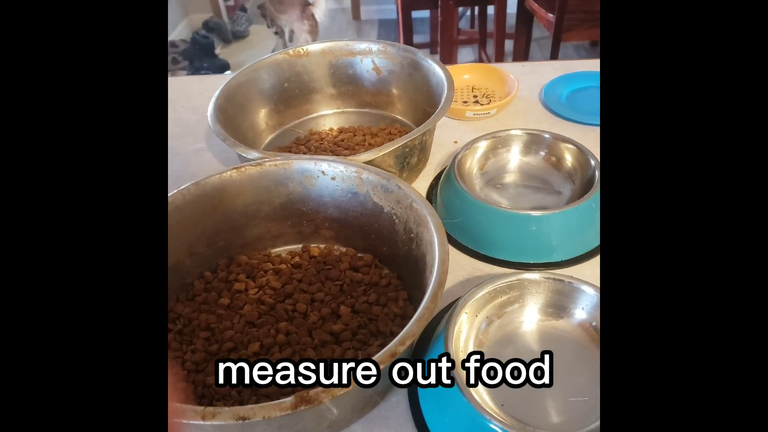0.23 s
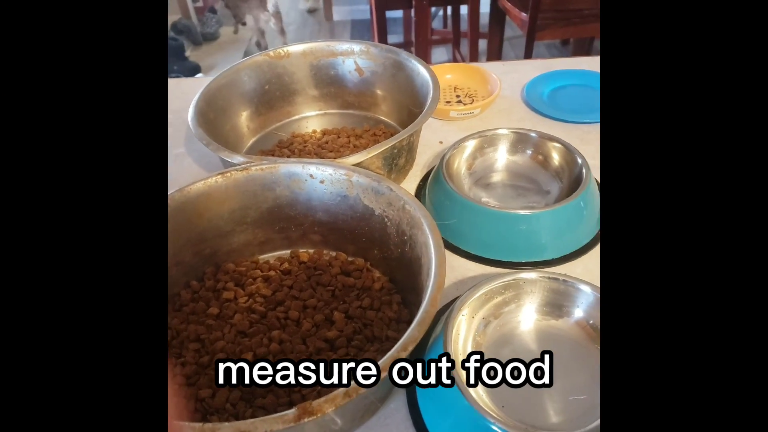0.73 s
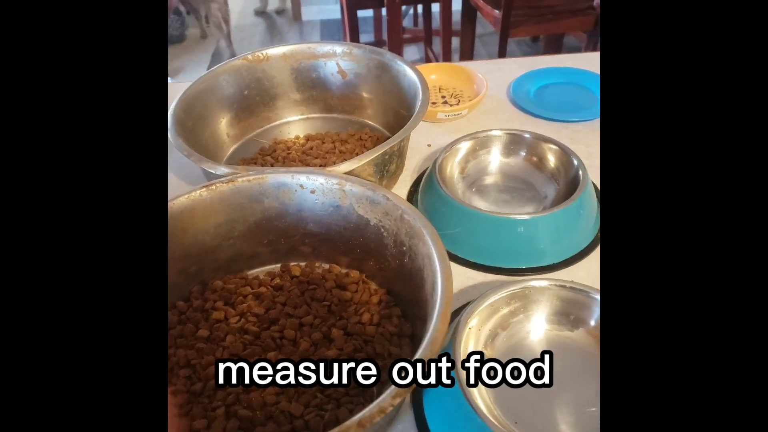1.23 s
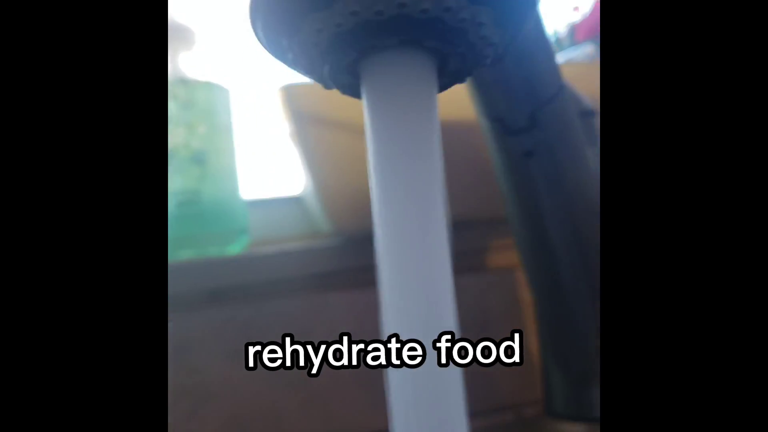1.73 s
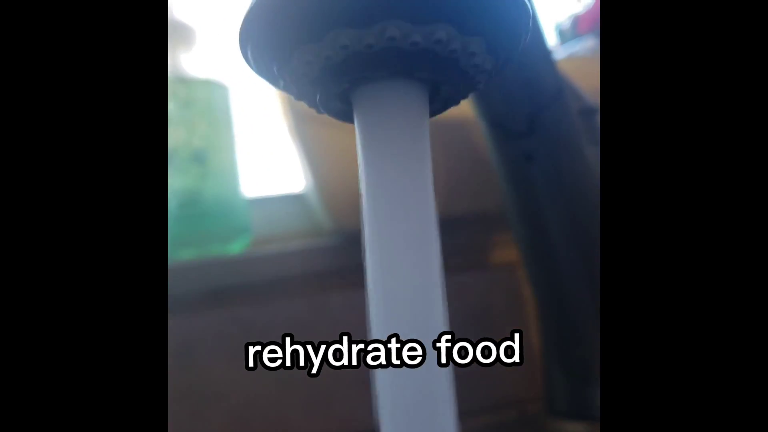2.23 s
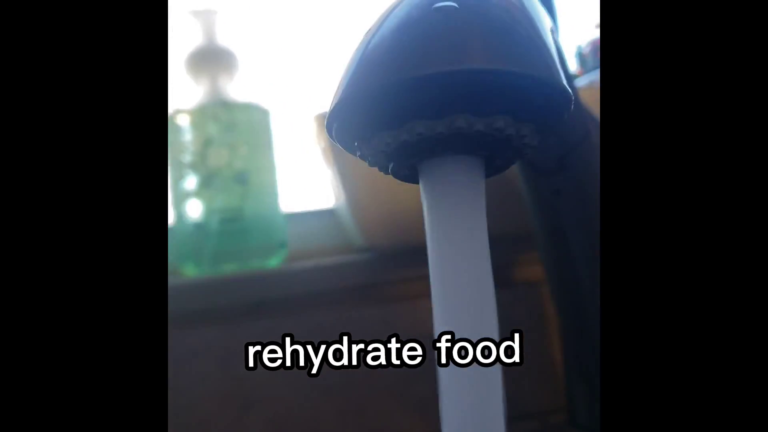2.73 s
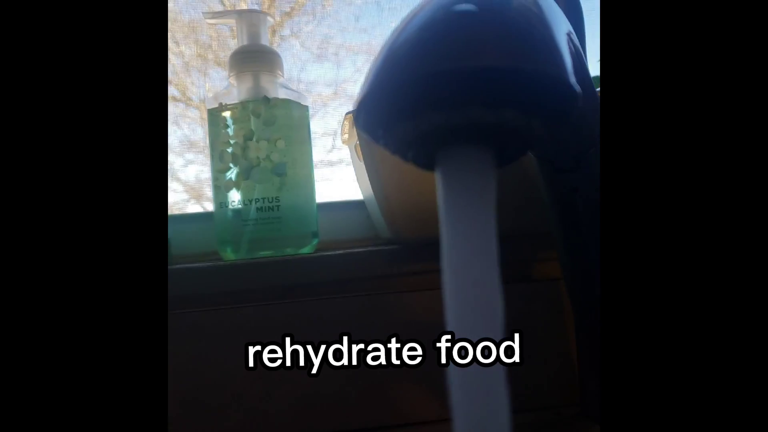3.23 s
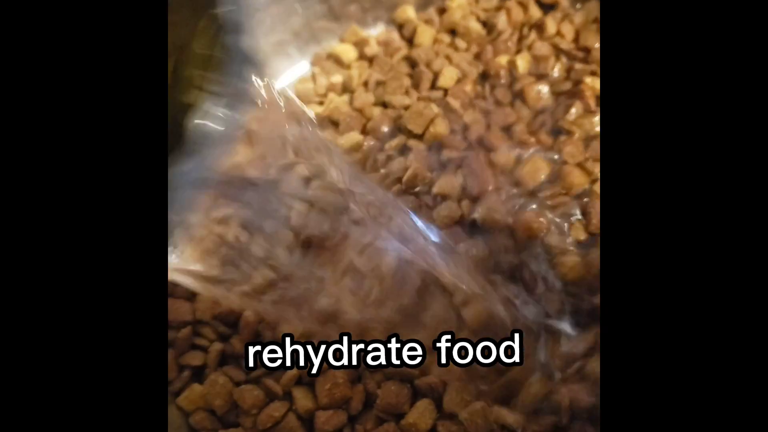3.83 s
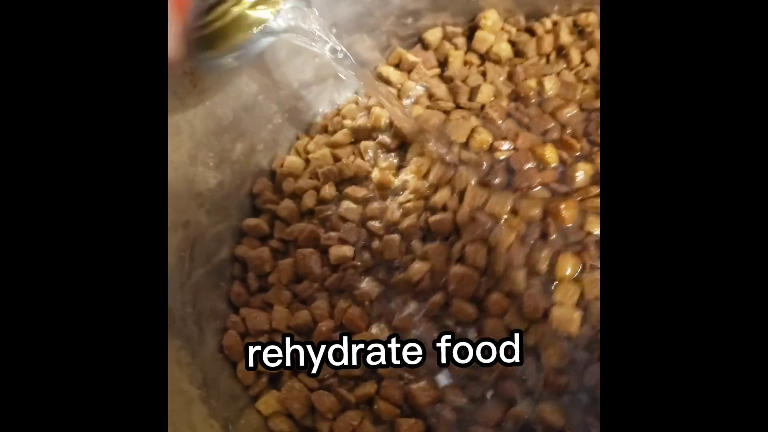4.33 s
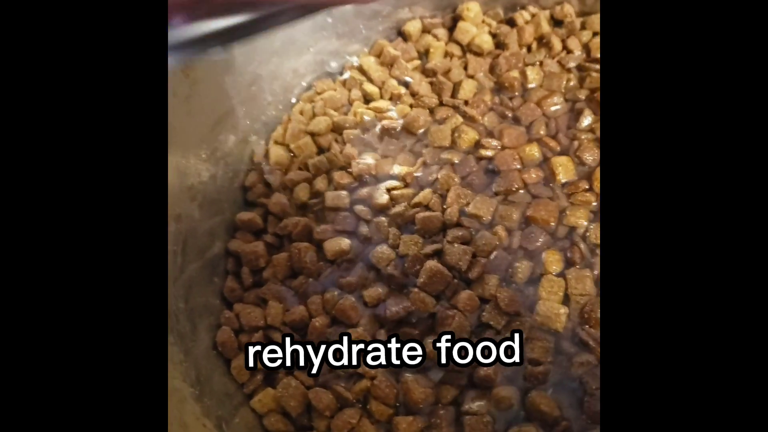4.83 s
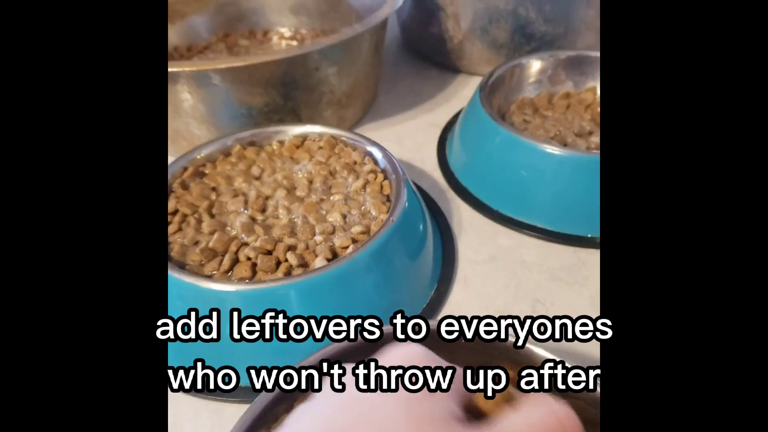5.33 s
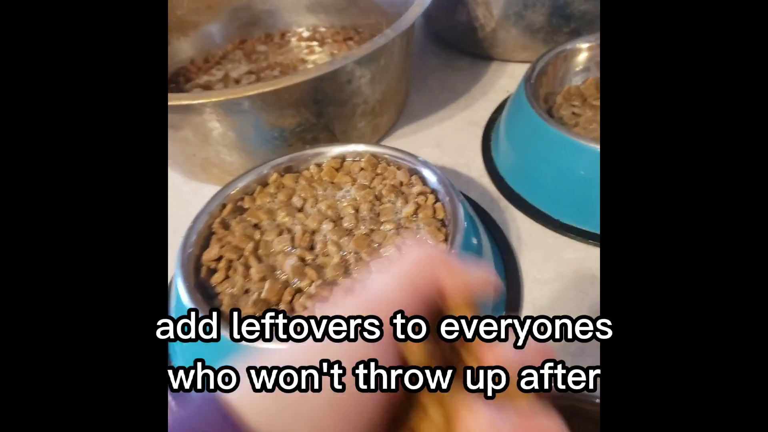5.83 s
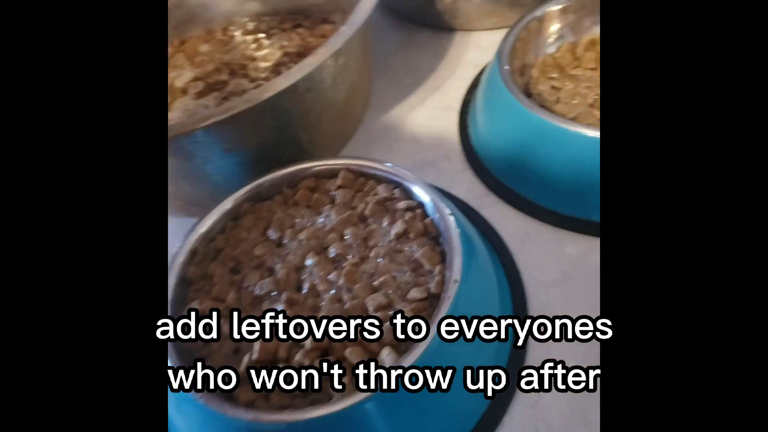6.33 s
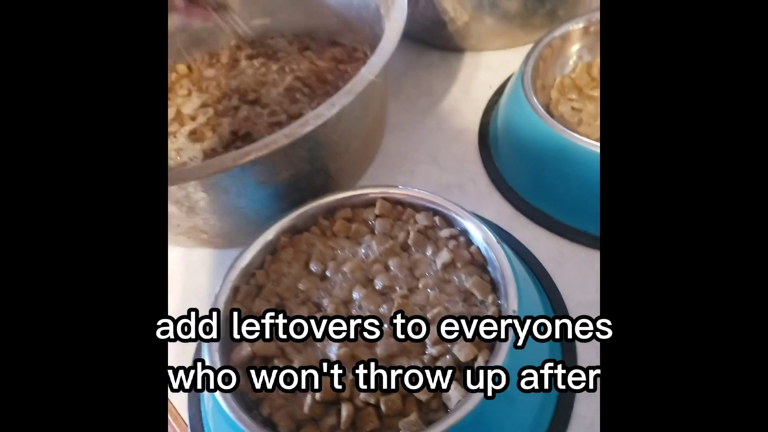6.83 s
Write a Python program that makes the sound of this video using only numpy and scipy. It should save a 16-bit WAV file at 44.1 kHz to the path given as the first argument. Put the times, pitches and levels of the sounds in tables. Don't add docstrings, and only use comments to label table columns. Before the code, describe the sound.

In a small hard kitchen, a phone close to the action catches faint dry ticks and cloth rustle over a low beating fridge hum. A tap lever thumps, spits air and rushes in loud broad hiss. After a cut, water splashes and gurgles over dry kibble, thinning to drips. Finally a ring pings a steel bowl, kibble clicks, and a handful patters down.

```python
import sys
import numpy as np
from scipy import signal
from scipy.fft import rfft, irfft, next_fast_len
from scipy.io import wavfile
from scipy.ndimage import uniform_filter1d

SR = 44100
rng = np.random.default_rng(int(sys.argv[2]) if len(sys.argv) > 2 else 0)


def gain_from_db(level_db):
    decades = np.asarray(level_db, float) / 20
    return 10 ** decades


def inscribe(sig):
    pcm = np.round(np.clip(np.atleast_2d(sig).T, -1, 1) * 32767)
    wavfile.write(sys.argv[1], SR, pcm.astype(np.int16))


N = 313110

# (start [s], end [s])
SHOTS = [
    (0, 1.239),
    (1.365, 3.46),
    (3.577, 5.169),
    (5.272, 7.11),
]
COUNTER_SHOT, TAP_SHOT, POUR_SHOT, HAND_SHOT = SHOTS
# (frequency [Hz], left minus right [dB])
HAND_LEAN = [(60, 2.5), (110, 3.6), (200, 1.9), (380, 2.3), (700, 3.5), (1290, 4.9), (2380, 4.2), (4400, 4),
             (8120, 19.6), (15000, 8.5)]
# (time [s], flow level [dB])
CAN_FLOW = [(3.58, -44.5), (3.75, -46), (3.83, -40.5), (3.92, -45), (4.2, -43.5), (4.3, -47.5), (4.53, -59),
            (4.6, -72)]


def curve(table):
    s, *columns = np.transpose(table)
    start = int(s[0] * SR)
    t = np.arange(start, min(int(s[-1] * SR), N)) / SR
    return start, [np.interp(t, s, c) for c in columns]


def on_log(hz, points):
    point_hz, value = np.transpose(points)
    return np.interp(np.log(hz), np.log(point_hz), value)


def walk(size, rate):
    k = int(SR / rate)
    steps = np.repeat(rng.standard_normal(size // k + 1), k)
    return 1.33 * uniform_filter1d(uniform_filter1d(steps, k), k)[:size]


def add(out, s, sound, pan_db=0.):
    i = int(s * SR)
    sound = np.atleast_2d(sound) * gain_from_db(np.array([[pan_db], [-pan_db]]) / 2)
    out[:, i:i + sound.shape[1]] += sound[:, :N - i]


def ring(hz, t60, glide=0., rise=0.00011):
    t = np.arange(int(min(t60, .6) * SR) + 8) / SR
    tone = np.sin(2 * np.pi * hz * t * (1 + glide * t / t60))
    return tone * (1 - np.exp(-t / rise)) * 1000 ** (-t / t60)


def whistle(out, table, wobble, rough_db):
    start, (hz, db) = curve(table)
    hz = hz * (1 + wobble * walk(len(hz), 90))
    tone = np.sin(2 * np.pi * np.cumsum(hz) / SR)
    add(out, start / SR, gain_from_db(db + rough_db * walk(len(hz), 60)) * tone, 3.)


def loudness(shot, rest, moves, moves_mix, flow=None, flow_mix=None):
    rise_db, fall_db_s = 21, 201
    t = np.arange(int(shot[0] * SR), min(int(shot[1] * SR), N)) / SR
    power = gain_from_db(np.array(rest)[:, None] + 0 * t) ** 2
    if flow is not None:
        power = power + gain_from_db(np.array(flow_mix)[:, None] + np.interp(t, *np.transpose(flow))) ** 2
    for s, db, rise, hold, tilt in moves:
        swell = -rise_db * np.maximum(s - t, 0) / max(rise, .003)
        shape = swell - fall_db_s * np.maximum(t - s - hold, 0)
        mix = np.array(moves_mix) + tilt * (np.arange(4) - 1)
        power = power + gain_from_db(db + (mix[:, None] + shape)) ** 2
    return 10 * np.log10(power)


def bed(out, shot, levels, tone, lean, flicker_db, grain_db, direct=0.):
    # (frequency [Hz], correlation [-1 to 1])
    likeness = [(60, 0.92), (130, 0.99), (290, 0.85), (640, 0.33), (1410, -0.5), (3100, -0.19), (6820, 0.1),
                (15000, -0.03)]
    control_hz = (200, 1500, 5700, 12500)
    port_lag_s = .0003
    length = len(levels[0])
    size = next_fast_len(length)
    hz = np.maximum(np.arange(size // 2 + 1) * SR / size, 1.)
    droplet_db = rng.standard_normal((2, size // 64 + 1)).repeat(64, axis=1)[:, :size]
    a, b = rfft(rng.standard_normal((2, size)) * gain_from_db(grain_db * droplet_db))
    alike = np.clip(on_log(hz, likeness), direct, .995)
    mid, side = a * np.sqrt(1 + alike), b * np.sqrt(1 - alike)
    tilt = gain_from_db(on_log(hz, lean) / 2)
    late = np.exp(-2j * np.pi * hz * port_lag_s * (direct > 0) * np.clip(hz / 1500, 0, 1))
    both = np.array([(mid + side) * tilt, (mid - side) / tilt * late])
    both = both * gain_from_db(on_log(hz, tone)) * (hz < 15650)
    edges = [(90, 450), (700, 3000), (4000, 8000), (10000, 15500)]
    centre_signal = both.mean(0)
    heard = [20 * np.log10(np.std(irfft(centre_signal * (hz > lo) * (hz < hi), size))) for lo, hi in edges]
    sound = 0
    for centre in 25 * 2 ** (np.arange(29) / 3):
        mask = np.clip(1 - abs(3 * np.log2(hz / centre)), 0, 1)
        share = [np.interp(np.log(centre), np.log(control_hz), row) for row in np.eye(4)]
        db = sum(w * (c - h) for w, c, h in zip(share, levels, heard))
        db = db + flicker_db * walk(length, 14.06)
        sound = sound + irfft(both * mask, size)[:, :length] * gain_from_db(db)
    add(out, shot[0], sound)


def fridge(out):
    # (frequency [Hz], level [dB], second frequency [Hz], second level [dB], null time [s])
    motors = [(65, -48.5, 59.5, -61.5, .24), (67.2, -53.5, 65, -62.5, 2.1), (66.9, -52, 59.3, -49, 3.9),
              (65.7, -53, 59.2, -58, 5.5)]
    # (frequency [Hz], level [dB])
    overtones = [(188.4, -76.5), (285.3, -78.5), (376.8, -75), (570.6, -91)]
    for (a, b), (hz, db, other_hz, other_db, null) in zip(SHOTS, motors):
        t = np.arange(int((b - a) * SR)) / SR + a - null
        first = np.sin(2 * np.pi * hz * t + .5 * walk(len(t), 2.6))
        second = np.sin(2 * np.pi * other_hz * t)
        add(out, a, gain_from_db(db + 2.3 * walk(len(t), 5)) * first, .5)
        add(out, a, -gain_from_db(other_db + 2.9 * walk(len(t), 3.2)) * second, .5)
    t = np.arange(int(COUNTER_SHOT[1] * SR)) / SR
    for hz, db in overtones:
        level = np.sqrt(2) * gain_from_db(db + 0.53 * walk(len(t), 5.8))
        add(out, 0, level * np.sin(2 * np.pi * hz * t), .5)


def ticks(out, table, crack_s, gain_db, tail_db, t60, note_db=-15.):
    # (frequency [Hz], level per Hz [dB])
    kibble_tone = [(240, -33.5), (400, 0), (570, -5), (1140, 0), (1250, -3.5), (2460, 0.5), (2820, -4),
                   (6890, -4.5), (8670, -9.5), (14600, 9), (15800, -23)]
    # (time [s], left minus right [dB])
    place = [(1., 6), (4., 8), (5.4, 11.5), (5.95, 3.5), (6.45, 16), (6.75, 15.5), (7.05, 10.5)]
    t = np.arange(8192) / SR
    hz = np.maximum(np.arange(4097) * SR / 8192, 1.)
    for s, db, body, edge, *note_hz in table:
        pan = np.interp(s, *np.transpose(place))
        tilt = [(1400, body + 9.9), (4500, 0), (7500, 0.0027), (12000, edge + 3.9)]
        colour = gain_from_db(on_log(hz, kibble_tone) + on_log(hz, tilt))
        noise = irfft(rfft(rng.standard_normal((3, len(t)))) * colour)
        noise /= noise.std()
        crack = noise[0] * (1 - np.exp(-t / 0.0002)) * np.exp(-t / crack_s)
        tail = noise[1:] * (1 - np.exp(-t / 0.0016)) * 1000 ** (-t / t60)
        add(out, s - .0003, gain_from_db(db + gain_db) * crack / abs(crack).max(), pan)
        add(out, s, gain_from_db(db + tail_db) * tail, 0.48 * pan)
        note = ring(*(note_hz or [1900 * 3.3 ** rng.random()]), 0.009)
        add(out, s, gain_from_db(db + gain_db + note_db - .6 * (edge + 12) * (edge > -12)) * note, pan)


def counter(out):
    # (time [s], peak [dB], body [dB], edge [dB])
    dry_ticks = [(0.1311, -65, -27, -6), (0.302, -59.5, -7, -3), (0.4783, -58, -30, -4),
                 (0.4883, -42.5, -37, -4), (0.618, -54, -54, -6), (0.971, -63, -6, -25),
                 (0.977, -63, -8, -25), (0.982, -66, -6, -25), (1.039, -60, -37, -6),
                 (1.059, -60, -23, -20), (1.047, -53, -37, -6)]
    # (rumble [dB], body [dB], hiss [dB], spray [dB])
    rest = (-64, -85, -92, -85.5)
    # (time [s], peak [dB], rise [s], hold [s], tilt from range to range [dB]), and their mix [dB]
    cloth = [(.16, -81, .05, 0.18, 1.5), (0.506, -61, .04, .01, -1.5), (0.722, -72, 0.1, .02, -0.5),
             (1.045, -76.5, .015, .02, 5.5)]
    cloth_mix = (-3, -7.5, -8, -1.5)
    # (frequency [Hz], level per Hz [dB])
    tone = [(47, -13), (80, -9), (114, -12), (194, -19), (322, -29.5), (385, -24), (480, -41), (1580, -48),
            (6820, -43.5), (8320, -58), (14500, -55), (15800, -53)]
    ticks(out, dry_ticks, crack_s=0.0026, gain_db=-1.5, tail_db=-10.5, t60=0.3, note_db=-26.)
    levels = loudness(COUNTER_SHOT, rest, cloth, cloth_mix)
    bed(out, COUNTER_SHOT, levels, tone, HAND_LEAN, flicker_db=-2.5, grain_db=1.0)


def chimes(out):
    # (time [s], frequency [Hz], level [dB], ring time [s])
    small_rings = [(.145, 11700, -61, 0.17), (1.06, 11750, -61.5, 0.11), (6.621, 1550, -46, 0.035),
                   (6.63, 1530, -58, .15), (.508, 1100, -72, .07), (.99, 960, -74, .06),
                   (5.83, 2100, -37.5, 0.032), (5.83, 5000, -37, .02)]
    for s, hz, db, t60 in small_rings:
        note = ring(hz, t60)
        add(out, s, gain_from_db(db + 4.6 * walk(len(note), 150)) * note)


def tap(out):
    # (time [s], frequency [Hz], level [dB])
    valve = [(1.369, 4520, -71), (1.432, 4540, -66.5), (1.5, 4600, -54), (1.551, 4600, -82.5)]
    # (time [s], peak [dB], body [dB], edge [dB])
    spits = [(1.4935, -22, -14, -10), (1.5035, -17, -30, -2), (1.5315, -16, -30, -2)]
    # (rumble [dB], body [dB], hiss [dB], spray [dB])
    rest = (-56.5, -86, -81, -89.5)
    flow_mix = (-28, -20, -10.5, 0.5)
    # (time [s], flow level [dB])
    flow = [(1.43, -84.5), (1.477, -60), (1.481, -33.5), (1.496, -23.5), (1.52, -23), (1.77, -26),
            (2.55, -26.5), (2.7, -28.5), (3.1, -29.5), (3.46, -30)]
    # (time [s], peak [dB], rise [s], hold [s], tilt from range to range [dB]), and their mix [dB]
    lever = [(1.44, -32, 0.012, 0.059, -1), (1.725, -35.5, 0.033, .005, 9.5), (2.3, -53.5, .2, .25, 3)]
    lever_mix = (0.5, -14.5, -41, -55)
    # (frequency [Hz], left minus right [dB])
    tone = [(15, -62), (25, -55), (37, -32), (49, -16.5), (74, -5), (141, -13.5), (248, -13.5), (527, -27),
            (1040, -25), (2660, -14.5), (3390, -17.5), (6660, -10.5), (8270, -18.5), (14600, -3),
            (15800, -10)]
    lean = [(60, -0.5), (300, 1.5), (700, 0), (1300, 6), (2400, -3.5), (4400, 2.2), (8000, 3), (11000, 1.5),
            (15000, 6)]
    whistle(out, valve, wobble=0.0057, rough_db=-5.0)
    ticks(out, spits, crack_s=0.0009, gain_db=0.0, tail_db=-30., t60=.05)
    levels = loudness(TAP_SHOT, rest, lever, lever_mix, flow, flow_mix)
    bed(out, TAP_SHOT, levels, tone, lean, flicker_db=1.12, grain_db=1.17, direct=.3)


def splashes(out, table, cycles, gain_db, pan_db, spread, near=0.):
    for s, db, hz in table:
        add(out, s, gain_from_db(db + gain_db) * ring(hz, cycles / hz, glide=0.18), pan_db)
        for lag, up, size in rng.random((7, 3)):
            small = ring(max(800, near * hz) * spread ** up, .004, glide=.25)
            add(out, s + .0015 * lag, gain_from_db(db + gain_db - 3.5 - 6 * size) * small, pan_db)


def tap_sputter(wet):
    # (time [s], peak [dB], pitch [Hz])
    sputter = [(1.433, -23, 914), (1.493, -27.5, 895), (1.692, -27, 2010), (1.699, -23, 1870),
               (1.706, -26, 2280), (1.712, -24, 1500), (1.716, -13.5, 1780), (1.7195, -14.5, 2280),
               (1.723, -18, 2630), (1.73, -25, 2000), (1.83, -30, 1500)]
    splashes(wet, sputter, cycles=28.0, gain_db=-5.0, pan_db=4.5, spread=2.2, near=.75)


def thumps(out):
    # (time [s], peak [dB], pitch [Hz], length [cycles])
    blows = [(1.4334, -12, 160, 2.4), (1.7196, -23.5, 104.8, 1.6)]
    for s, db, hz, cycles in blows:
        turn = np.arange(int(cycles / hz * SR)) * hz / SR
        add(out, s, -gain_from_db(db) * np.sin(2 * np.pi * turn) * np.sin(np.pi * turn / cycles), 1.5)


def knocks(out):
    # (time [s], peak [dB], pitch [Hz])
    pushes = [(1.434, -24, 290), (1.446, -30.5, 170), (1.464, -22, 113), (1.48, -27.5, 176),
              (1.509, -29.5, 109), (1.554, -28, 154.4), (1.718, -37, 317), (1.734, -33.5, 109),
              (1.806, -39.5, 348), (1.808, -34, 100), (2.54, -40, 111.3), (3.738, -46, 240),
              (3.849, -46, 235), (4.393, -40.5, 226.6), (4.604, -41.5, 229), (4.783, -41.5, 222),
              (5.529, -51, 227.5), (5.559, -46, 152), (6.898, -44, 137), (6.96, -48, 210), (7.0, -46, 150),
              (7.045, -47, 220)]
    for s, db, hz in pushes:
        t60 = np.clip(0.061 + 0.18 * hz / 1000, .02, .3)
        add(out, s, gain_from_db(db + 4.0) * ring(hz, t60, rise=0.001), 1.5)
        add(out, s, gain_from_db(db - 6.0) * ring(1.6 * hz, 1.2 * t60, rise=0.00075), 1.5)


def pour(out):
    # (time [s], peak [dB], body [dB], edge [dB])
    drops = [(3.727, -20, -18, -18), (3.707, -27, -16, -18), (3.816, -27, -16, -16), (4.04, -28, -20, -14),
             (4.131, -29, -18, -14), (4.422, -33, -20, -14), (4.155, -31, -16, -14), (4.248, -27, -14, -16),
             (4.324, -32, -26, -16)]
    # (rumble [dB], body [dB], hiss [dB], spray [dB])
    rest = (-57.5, -63.5, -51, -40.5)
    flow_mix = (-23, 0, -1, -9)
    # (time [s], peak [dB], rise [s], hold [s], tilt from range to range [dB]), and their mix [dB]
    slosh = [(3.6, -52.5, .02, 0.023, 0), (3.83, -45.5, .06, 0.018, 6.5), (4.45, -54, .1, 0.016, -1),
             (4.8, -54, 0.2, 0.047, 0)]
    slosh_mix = (1.5, -16, -8.5, -20)
    # (frequency [Hz], left minus right [dB])
    tone = [(47, -27), (80, 4.5), (93, -10), (242, 1), (393, -22.5), (459, -10), (548, -18.5), (1020, -15),
            (1620, -17), (6520, -12), (8140, -21), (12400, -4), (15800, -6.5)]
    lean = [(60, 4), (200, 1.5), (700, 4.5), (1300, 4), (2400, 3.5), (4400, 4), (8000, 6), (11000, -6.5),
            (15000, 0.5)]
    # (time [s], frequency [Hz], level [dB])
    glug = [(3.72, 791, -56), (3.74, 812, -49), (3.785, 850, -48.5), (3.8, 900, -39.5), (3.83, 970, -44),
            (3.866, 1050, -42.5), (3.88, 1080, -53), (3.905, 1173, -45), (3.925, 1200, -58)]
    gulp = [(3.81, 790, -60), (3.835, 744, -44), (3.85, 736, -50), (3.87, 725, -43), (3.9, 720, -58)]
    ticks(out, drops, crack_s=.001, gain_db=0., tail_db=-30., t60=.05)
    levels = loudness(POUR_SHOT, rest, slosh, slosh_mix, CAN_FLOW, flow_mix)
    bed(out, POUR_SHOT, levels, tone, lean, flicker_db=1.65, grain_db=1.34)
    whistle(out, glug, wobble=.018, rough_db=3.5)
    whistle(out, gulp, wobble=.015, rough_db=3.)


def gurgle(wet):
    s, flow_db = np.transpose(CAN_FLOW)
    for when, up, size, side in rng.random((900, 4)):
        at = POUR_SHOT[0] + when * .98
        hz = 500 * 12 ** up
        level = gain_from_db(np.interp(at, s, flow_db) - 7.0 - 2.5 * np.log(size + 0.03))
        add(wet, at, level * ring(hz, 14 / hz, glide=0.37), 12 * side + .1)


def can_splashes(wet):
    # (time [s], peak [dB], pitch [Hz])
    plunges = [(3.581, -31, 610), (3.643, -35, 1010), (3.707, -25.5, 1130), (3.725, -35, 820),
               (3.797, -29, 899), (3.816, -25.5, 2250), (3.833, -30, 725), (3.852, -32, 1030),
               (3.866, -30.5, 716), (3.906, -30, 1190), (3.95, -29, 1600), (3.977, -25.5, 3050),
               (4.04, -24, 3210), (4.074, -29, 3100), (4.131, -22, 3070), (4.154, -21.5, 2980),
               (4.175, -26.5, 3000), (4.202, -29, 2930), (4.247, -20.5, 3440), (4.323, -35, 1070),
               (4.422, -29.5, 2500), (4.476, -32, 3500), (4.511, -36.5, 1030), (4.524, -36, 790)]
    splashes(wet, plunges, cycles=12., gain_db=-2.5, pan_db=5.5, spread=8.)


def drips(wet):
    # (time [s], peak [dB], pitch [Hz])
    single_drops = [(3.962, -35, 1600), (4.02, -39, 640), (4.317, -37, 1250), (4.379, -34, 3800),
                    (4.403, -34, 3600), (4.421, -33, 2500), (4.476, -33.5, 950), (4.526, -36.5, 600),
                    (4.548, -42, 1200)]
    for s, db, hz in single_drops:
        add(wet, s, gain_from_db(db) * ring(hz, 11.0 / hz, glide=.2, rise=0.00047), 4.)


def basin(wet):
    t60, level_db = 0.1, -5.5
    t = np.arange(SR // 4) / SR
    tail = rng.standard_normal((2, len(t))) * 1000 ** (-t / t60) * (t > .002)
    tail = tail / np.sqrt(np.sum(tail ** 2, axis=1, keepdims=True))
    return gain_from_db(level_db) * signal.fftconvolve(wet, tail, axes=1)[:, :N]


def steel(out):
    # (frequency [Hz], level [dB], ring time [s])
    modes = [(6632, -10, .15), (6918, -11, .24), (7111, -2, .16), (7477, -12, .06), (8780, -27, .16),
             (9561, -22, .1), (10000, -18, .04), (10930, -27, .13), (11640, -27, .16)]
    # (time [s], level [dB])
    hits = [(5.663, -25), (5.29, -65)]
    # (from [Hz], to [Hz])
    wash_hz = (7400, 12800)
    wash_db, wash_t60 = -11, .24
    wash_band = signal.butter(2, wash_hz, "band", fs=SR, output="sos")
    t = np.arange(SR // 4) / SR
    for s, db in hits:
        for hz, mode_db, t60 in modes:
            note = ring(hz, t60)
            add(out, s, gain_from_db(db + mode_db + 3.5 * walk(len(note), 160)) * note, 7.)
        wash = signal.sosfilt(wash_band, rng.standard_normal((2, SR // 4)))
        add(out, s, gain_from_db(db + wash_db) * wash * 1000 ** (-t / wash_t60), 5.)


def hand(out):
    # (time [s], peak [dB], body [dB], edge [dB])
    kibble = [(5.291, -48.5, -11.5, -1), (5.3306, -36.5, -34, 11), (5.44, -52.5, -11, -5),
              (5.5409, -49, -11, -19), (5.5906, -49, 2, -19.5), (5.6627, -25, -7.5, 0),
              (5.6695, -26, -17, -5.5), (5.8296, -24.5, -10.5, -20), (5.8382, -29.5, -9, -18),
              (5.89, -31, -14, -3), (5.8976, -33.5, -1, -11), (5.92, -48, 2, -25), (5.9441, -43, -4, -14),
              (5.9615, -46.5, 0, -25), (6.4506, -55, -23, -23), (6.5224, -48, -28.5, -16),
              (6.6008, -52, -30, -10), (6.6195, -36.5, -37, -19), (6.6238, -35, -17, -12),
              (6.7191, -42.5, -15, -29), (6.7375, -35, -15, -24.5), (6.743, -36, -11, -19),
              (6.7483, -31.5, -13, -2.5), (6.777, -33, -24, -25), (6.8007, -39, -17, -25),
              (6.86, -36.5, -22, -14)]
    # (time [s], peak [dB], body [dB], edge [dB], note [Hz])
    handful = [(6.864, -27, -26, -9.5, 6650), (6.871, -19.5, -37, -15, 6730), (6.886, -25, -22, -15, 5670),
               (6.89, -23.5, -20, -18.5, 6600), (6.902, -23, -25, -14, 6710), (6.916, -24, -24, -13, 5780),
               (6.934, -24, -22.5, -19, 5460), (6.972, -27.5, -20, -22, 1960), (6.98, -28, -21, -19, 3670),
               (6.991, -28, -20, -11.5, 1630), (6.999, -25, -26, -14, 5600), (7.006, -29, -20, -16, 3390),
               (7.021, -26, -25, -19, 4100), (7.026, -27, -24, -12, 2570), (7.042, -21, -28, -18, 6850),
               (7.056, -25.5, -28, -14, 7040), (7.064, -25.5, -24, -15.5, 6650),
               (7.082, -25.5, -20, -26, 2910), (7.095, -22.5, -35, -23, 2960)]
    # (rumble [dB], body [dB], hiss [dB], spray [dB])
    rest = (-64.5, -82, -83, -75)
    # (time [s], peak [dB], rise [s], hold [s], tilt from range to range [dB]), and their mix [dB]
    grab = [(5.3, -73.5, 0.021, 0.14, 6.5), (5.55, -62.5, 0.12, 0.027, -5.5), (5.85, -59.5, 0.022, 0.09, 1),
            (6.501, -77, .3, 0.067, 15.5), (6.76, -52, 0.038, .01, -3.5), (6.877, -46, .015, 0.04, 4.5),
            (6.95, -47, 0.058, .2, 1.5)]
    grab_mix = (-6, -0.5, -12, -20.5)
    # (frequency [Hz], level per Hz [dB])
    tone = [(47, -45), (80, -7.5), (130, -14.5), (177, -24), (226, -21), (337, -31.5), (974, -43.5),
            (1300, -47.5), (2880, -36.5), (6100, -25.5), (9290, -44.5), (15800, -21.5)]
    ticks(out, kibble, crack_s=0.0014, gain_db=-3.0, tail_db=-20.5, t60=0.27)
    ticks(out, handful, crack_s=.0012, gain_db=-3.5, tail_db=-22.5, t60=0.22, note_db=-8.)
    levels = loudness(HAND_SHOT, rest, grab, grab_mix)
    bed(out, HAND_SHOT, levels, tone, HAND_LEAN, flicker_db=2.0, grain_db=2.0)


def rattle(out):
    # (from [s], to [s])
    start_s, end_s = (6.865, 7.1)
    for when, up, size, side in rng.random((170, 4)):
        hz = 2000 * 4. ** up
        level = gain_from_db(-45 - 3.8 * np.log(size + .03))
        add(out, start_s + when * (end_s - start_s), level * ring(hz, 7 / hz + .001), 14 * side)


def scene():
    wet, rest = np.zeros((2, N)), np.zeros((2, N))
    fridge(rest)
    counter(rest)
    chimes(rest)
    tap(rest)
    tap_sputter(wet)
    thumps(rest)
    knocks(rest)
    pour(rest)
    gurgle(wet)
    can_splashes(wet)
    drips(wet)
    steel(rest)
    hand(rest)
    rattle(rest)
    return wet + basin(wet) + rest


def starve(x):
    # (from [Hz], to [Hz], threshold under the top [dB])
    holes = [(3000, 5100, -8), (7800, 9600, -11.5)]
    hz, _, z = signal.stft(x, SR, nperseg=2048)
    power = 10 * np.log10(np.mean(abs(z) ** 2, axis=0) + 1e-16)
    top = uniform_filter1d(power[(hz > 11000) & (hz < 15000)].mean(0), size=9)
    treble = 10 * np.log10(np.sum(abs(z[:, hz > 2500]) ** 2, axis=(0, 1)) + 1e-16)
    calm = (treble - np.roll(treble, 1) < 5) & (treble - np.roll(treble, 2) < 7)
    for lo, hi, under_db in holes:
        level = uniform_filter1d(power[(hz >= lo) & (hz < hi)].mean(0), size=9)
        depth = top + under_db - level
        chance = np.clip(.2 + .07 * depth, .04, .5) * calm
        for edge in np.arange(lo, hi, 172):
            band = (hz >= edge) & (hz < edge + 172)
            kept = rng.random(len(top) // 2 + 1).repeat(2)[:len(top)] > chance
            z[:, band] *= np.where(kept, 1 / np.sqrt(1 - chance), .02)
    return signal.istft(z, SR, nperseg=2048)[1][:, :N]


def band_limit(x):
    return signal.sosfilt(signal.butter(12, 16830, fs=SR, output="sos"), x)


def record(dry):
    t = np.arange(N) / SR
    margin = 150 / SR
    gate = sum((t >= a + margin * (a > 0)) & (t < b - margin) for a, b in SHOTS)
    fade = uniform_filter1d(uniform_filter1d(1. * gate, size=150), size=150)
    low_cut = signal.butter(2, 38., "high", fs=SR, output="sos")
    mix = signal.sosfilt(low_cut, starve(dry)) * fade
    return band_limit(mix)


dry = scene()
out = record(dry)
inscribe(out)
```